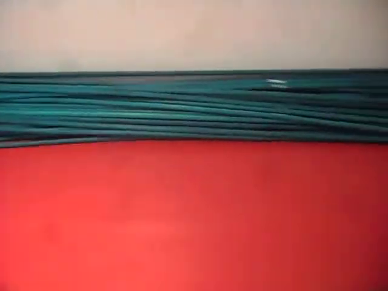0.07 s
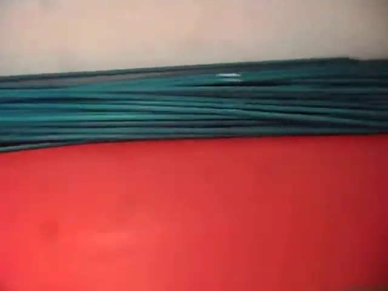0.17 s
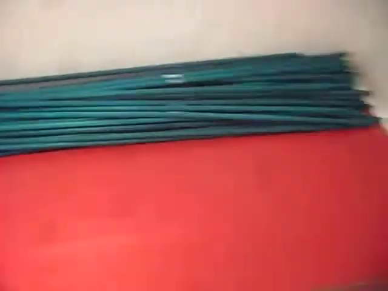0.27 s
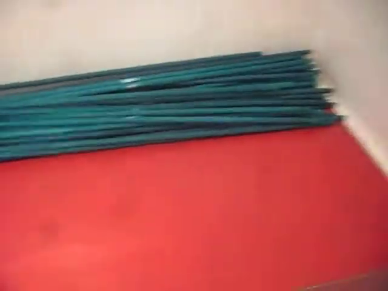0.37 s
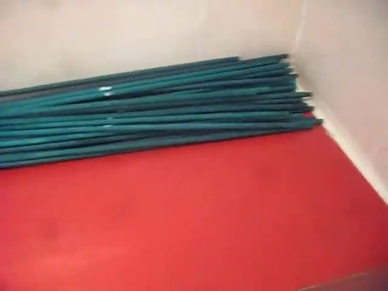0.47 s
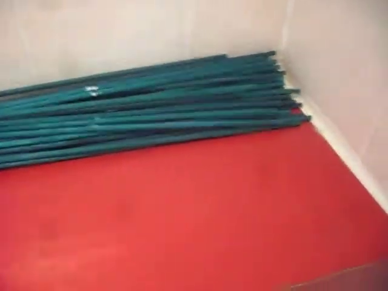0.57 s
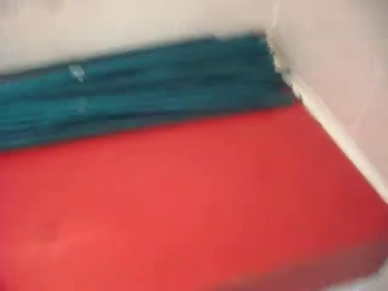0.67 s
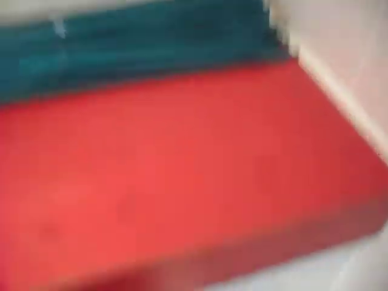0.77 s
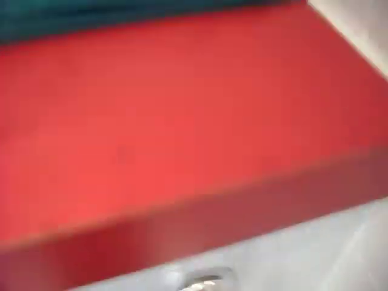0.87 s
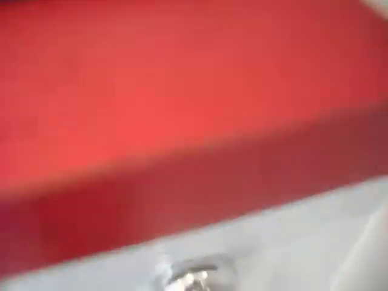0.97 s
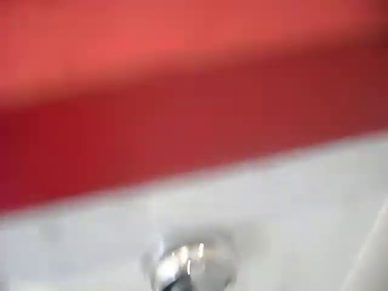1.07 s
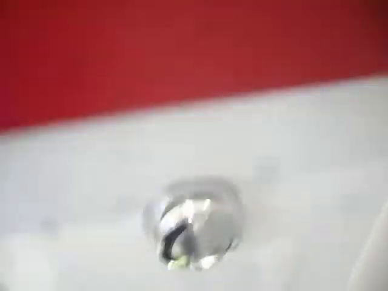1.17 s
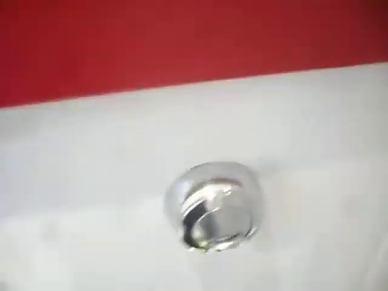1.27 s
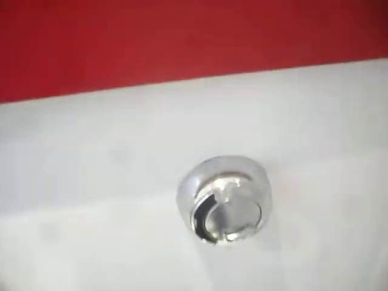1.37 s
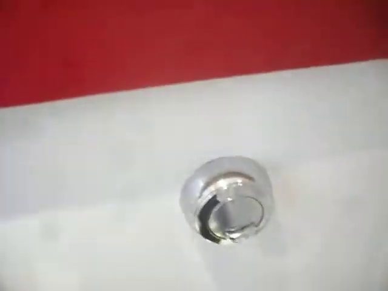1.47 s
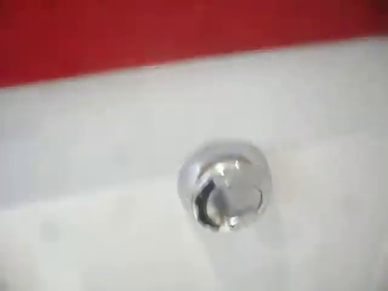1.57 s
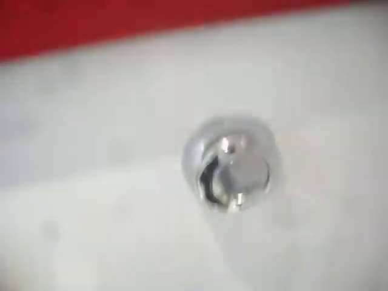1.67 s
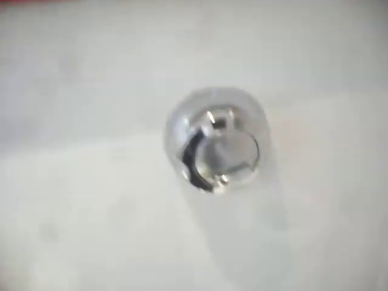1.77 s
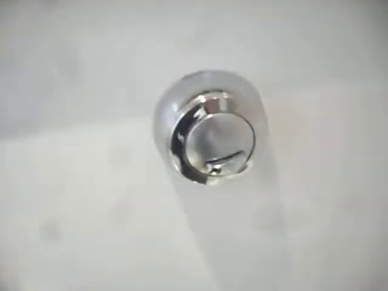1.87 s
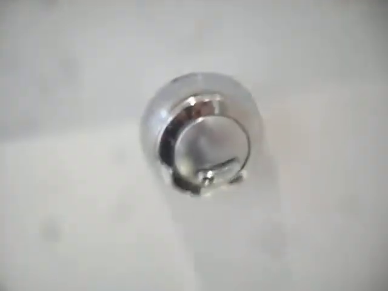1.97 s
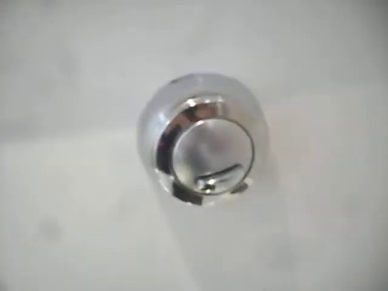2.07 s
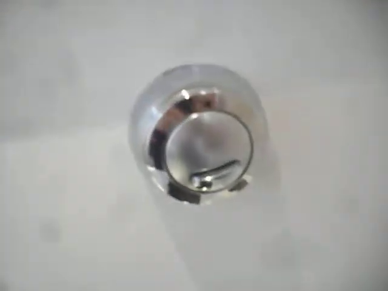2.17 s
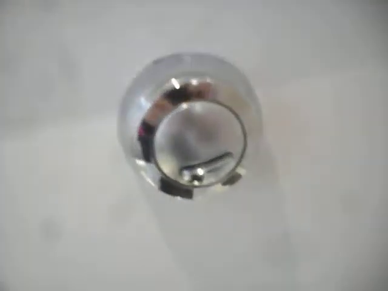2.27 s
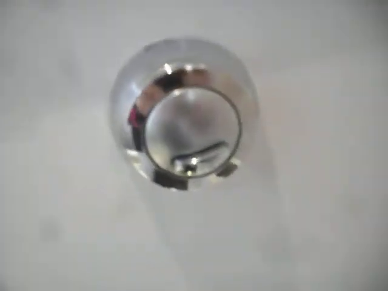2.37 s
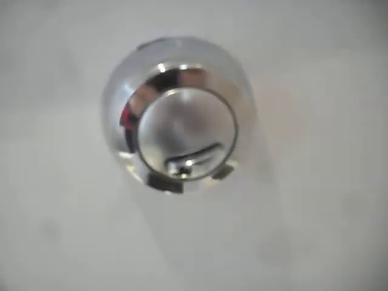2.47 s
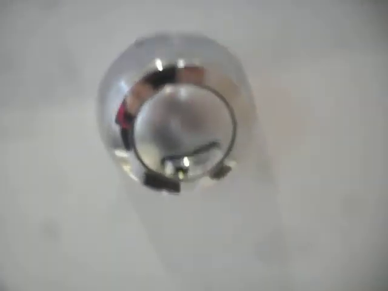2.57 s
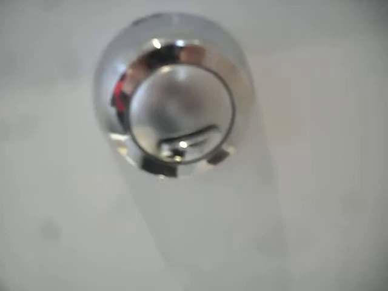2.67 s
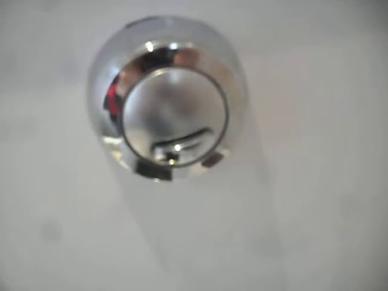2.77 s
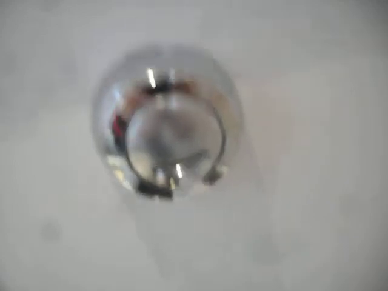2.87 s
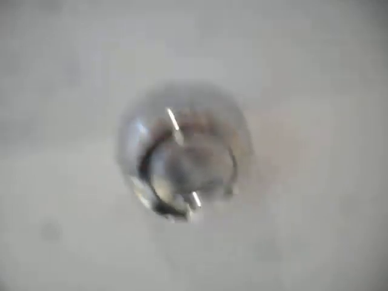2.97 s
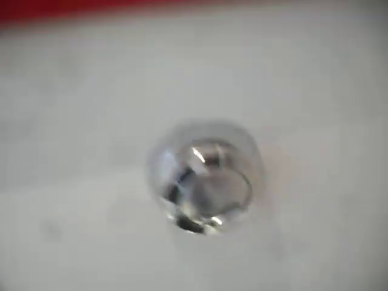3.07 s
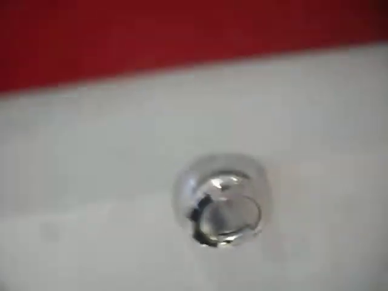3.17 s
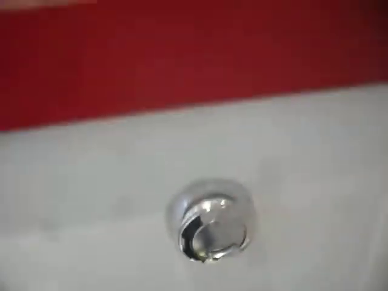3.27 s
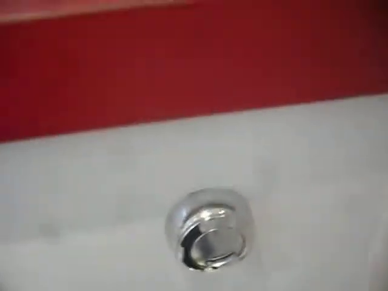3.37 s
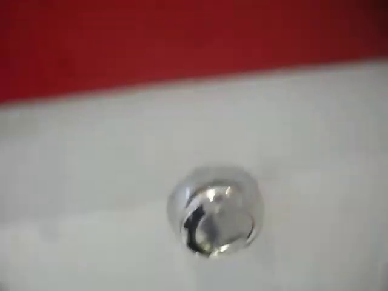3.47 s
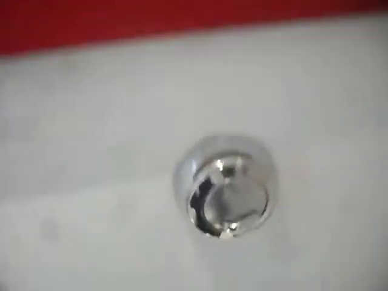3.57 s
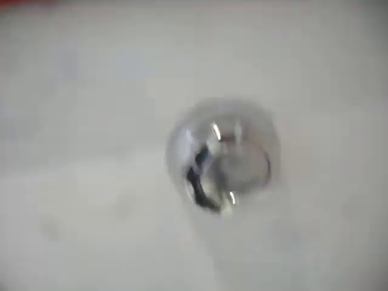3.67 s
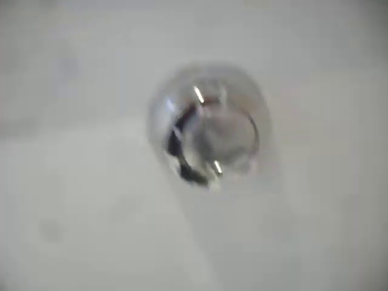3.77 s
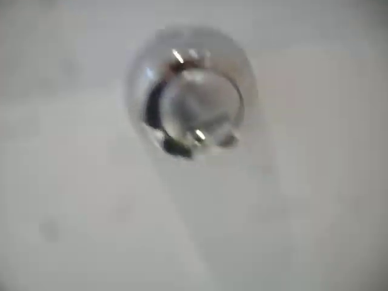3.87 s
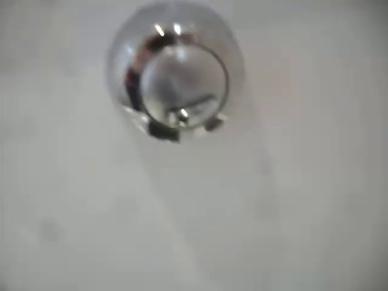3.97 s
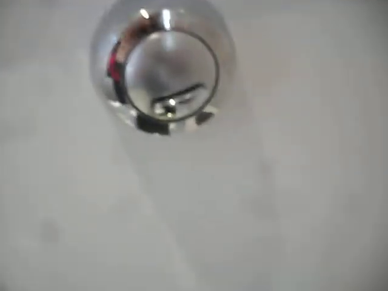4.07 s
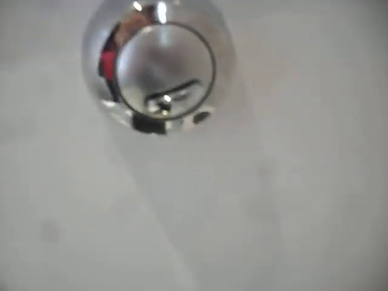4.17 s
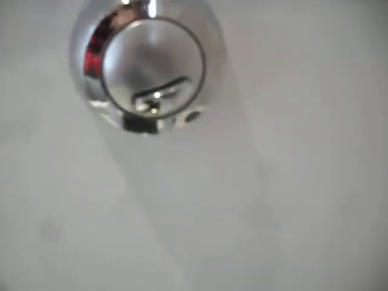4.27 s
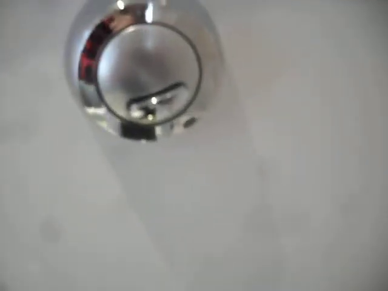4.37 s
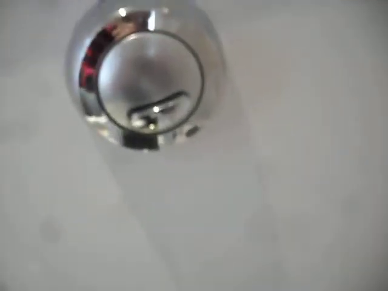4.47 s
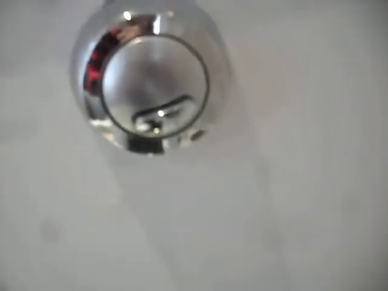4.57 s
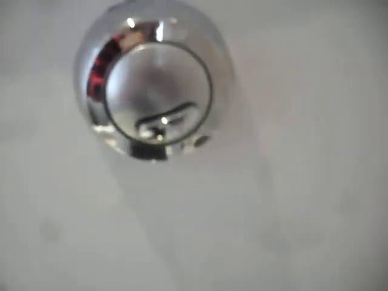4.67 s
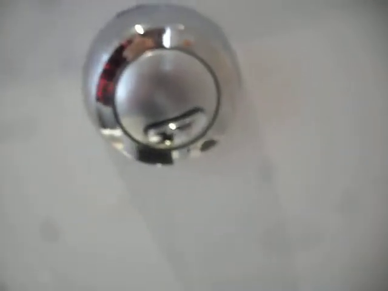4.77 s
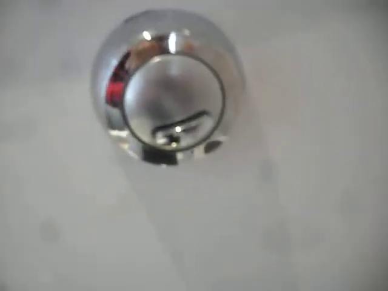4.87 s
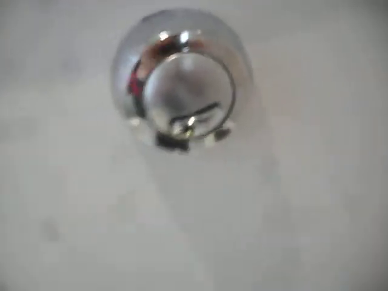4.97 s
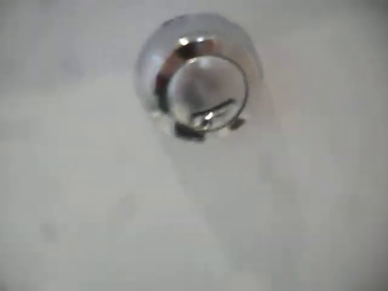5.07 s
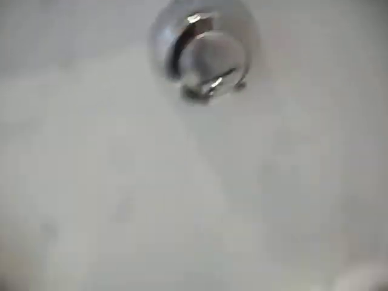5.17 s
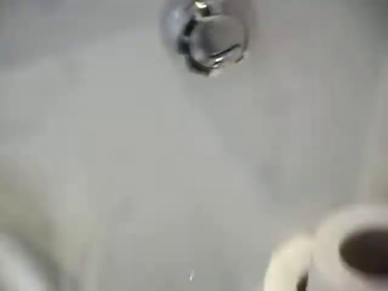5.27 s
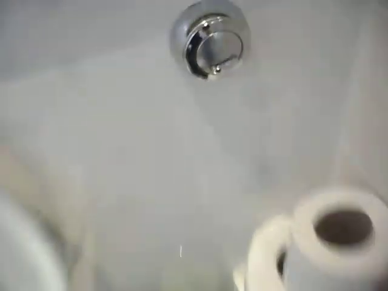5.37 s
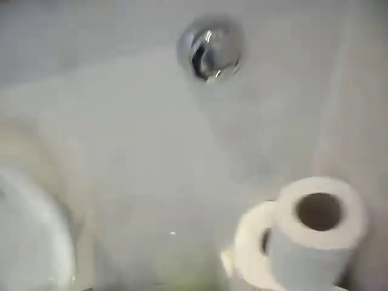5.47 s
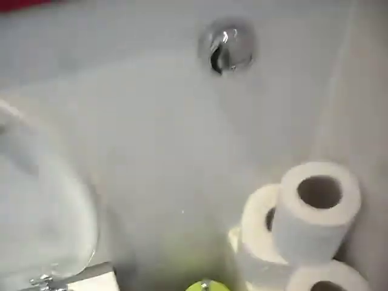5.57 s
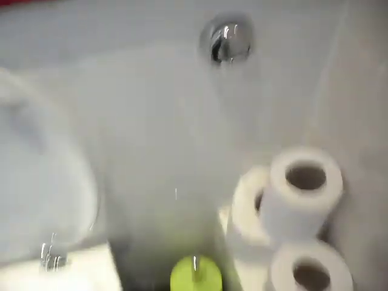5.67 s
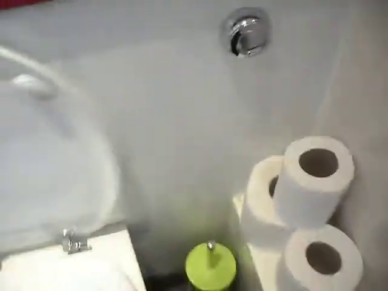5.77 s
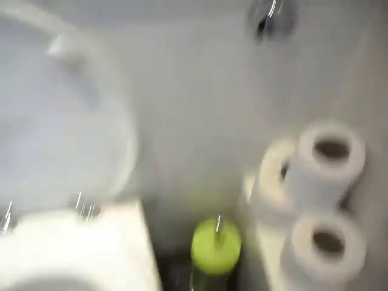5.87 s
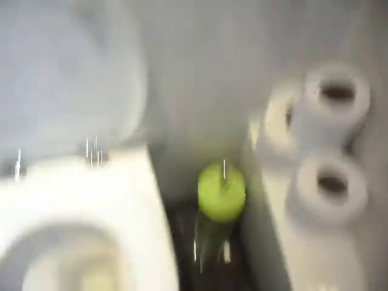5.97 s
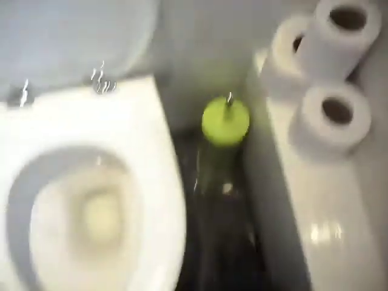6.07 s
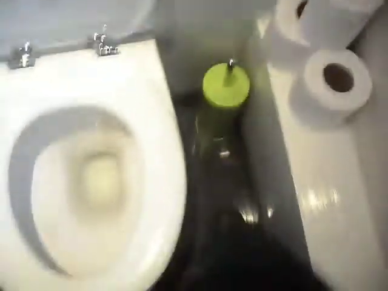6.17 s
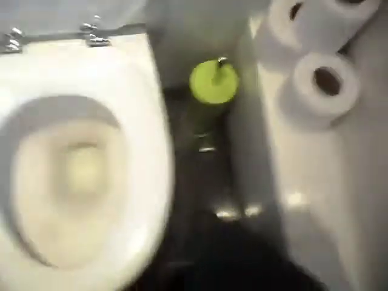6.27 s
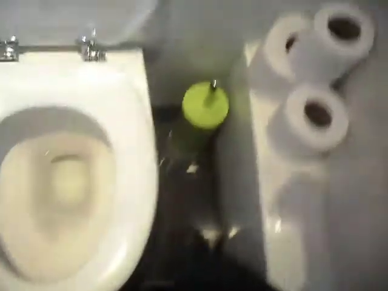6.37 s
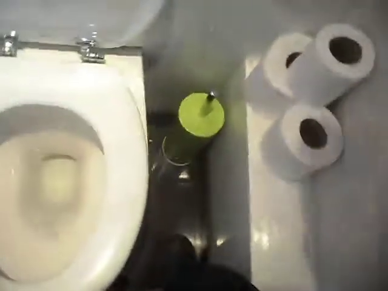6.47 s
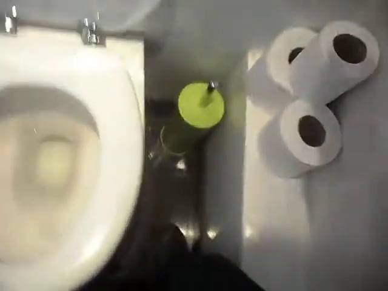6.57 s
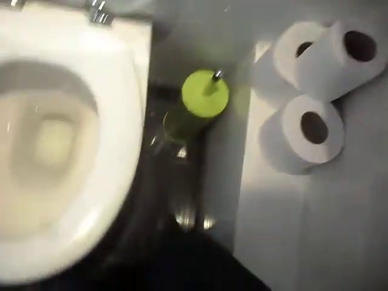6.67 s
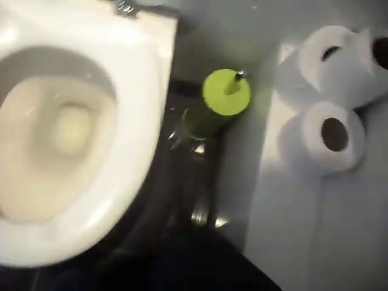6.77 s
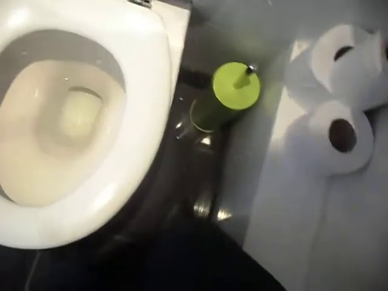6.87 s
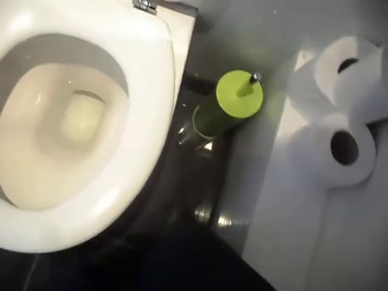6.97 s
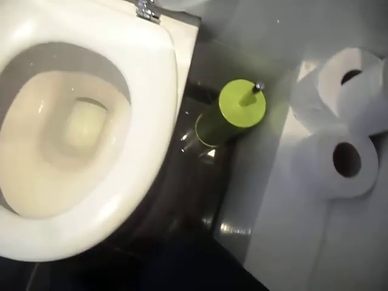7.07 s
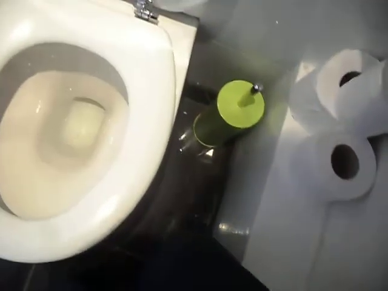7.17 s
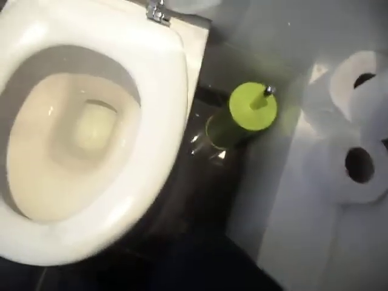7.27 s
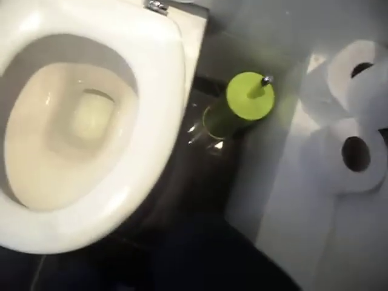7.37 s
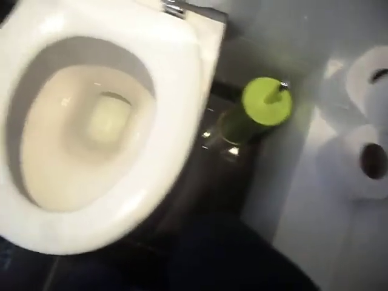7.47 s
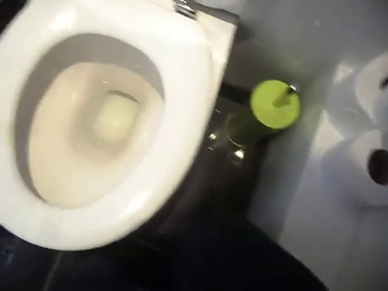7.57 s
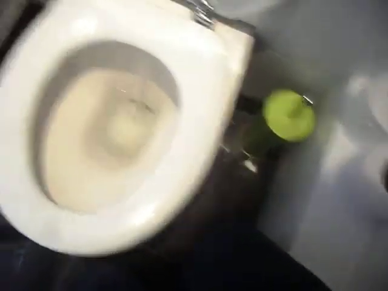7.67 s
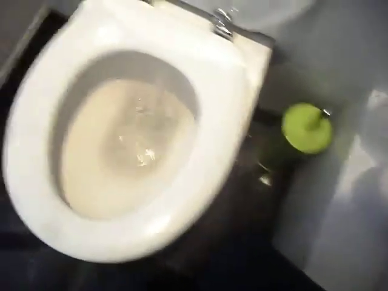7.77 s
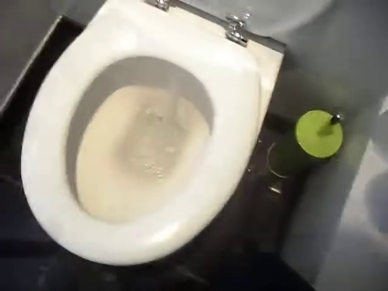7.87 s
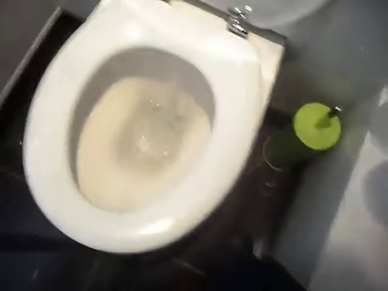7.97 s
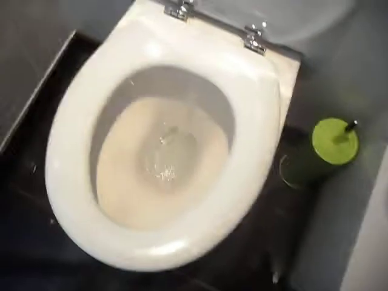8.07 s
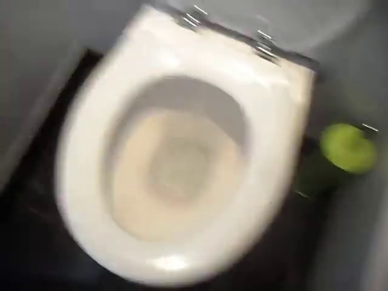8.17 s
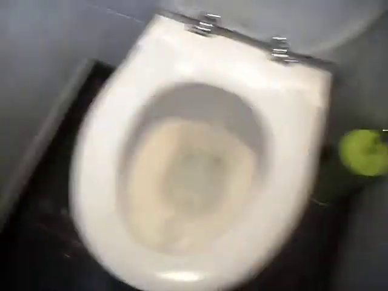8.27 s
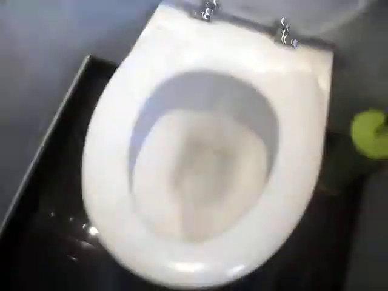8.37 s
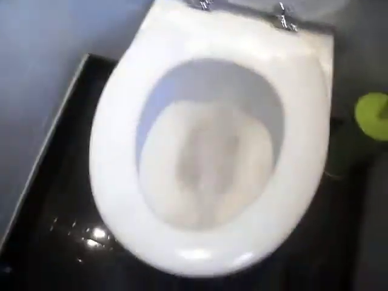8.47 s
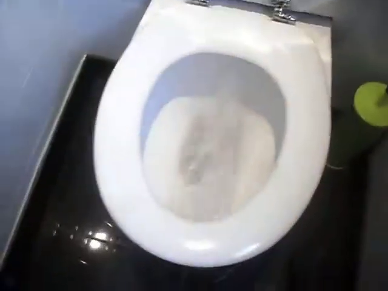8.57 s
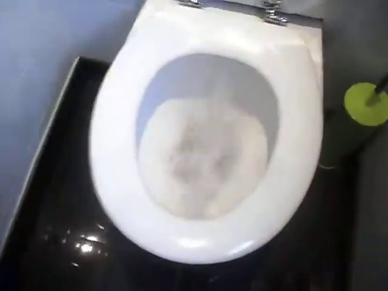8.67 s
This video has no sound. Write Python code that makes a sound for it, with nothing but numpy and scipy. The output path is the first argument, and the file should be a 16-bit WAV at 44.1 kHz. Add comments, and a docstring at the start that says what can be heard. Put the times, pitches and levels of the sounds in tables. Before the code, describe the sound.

A low ventilation hum fills a small tiled restroom, very quiet. At about 0.9 s a hard plastic knock hits the camera case close to the microphone, with a low bump and a faint short ring. Light rubs and small clicks follow, a duller tap at 1.6 s, and another sharp click at 3.0 s. It stays mostly quiet until 5 s, when clicks, low bumps and rustling fingers cluster until about 6.3 s. Dull, soft puffs come at 6.4 to 7.1 s as the button is pushed. From 7.3 s the flush starts: spitting water, sputtering hisses of air from the rim until about 7.75 s, and hollow, resonant gulps near 7.45 s. A strong slap and gulp land at 7.8 s, then bubbling, splashing water pours on, easing slightly around 8.2 s. Another gulp hits at 8.4 s, with a low drain rumble, and the bright spray and rush swell until the abrupt end around 8.7 s.

```python
"""A toilet is flushed in a small tiled restroom, heard from a hand-held camera over a low ventilation hum.
Fingers knock and rub on the camera's case, as ringing modes and tiny grains of noise, and the button is pushed
with low bumps and dull puffs. Water drives the air out of the rim as sputtering resonant hiss, then pours into
the bowl: filtered noise and drops, ringing bubbles, gulps, slaps and spray, with a rumble in the drain."""
import sys
import numpy as np
from scipy import signal
from scipy.fft import rfft, irfft
from scipy.io import wavfile
from scipy.ndimage import uniform_filter1d

SR = 44100
rng = np.random.default_rng(int(sys.argv[2]) if len(sys.argv) > 2 else 0)


def persist_wave(psi):
    """Save psi, clipped to +-1, as 16-bit WAV."""
    counts = np.round(np.clip(psi, -1, 1) * 32767).astype(np.int16)
    wavfile.write(sys.argv[1], SR, np.atleast_2d(counts).T)


N = 384552
TIME, FREQS = np.arange(N) / SR, np.fft.rfftfreq(N, 1 / SR)
SHORT = SR // 2  # samples in the half second that holds one short sound
AGE = TIME[:SHORT]  # seconds since a short sound began


def amp(db):
    """Decibels to gain."""
    return 10 ** (np.asarray(db) / 20)


def evened(x):
    """Scales to rms 1."""
    return x / np.sqrt(np.mean(x ** 2) + 1e-20)


def read(points, hz):
    """Reads a spectrum on a log-frequency axis."""
    f, value = np.transpose(points)
    return np.interp(np.log(hz + 1), np.log(f + 1), value)


def level(rows, column=1):
    """One dB column of a curve as a gain over time, silent before the curve begins."""
    rows = np.array(rows)
    return amp(np.interp(TIME, rows[:, 0], rows[:, column], left=-np.inf))


def add(mix, s, sound):
    """Mixes a sound in at time s."""
    part = mix[round(s * SR):][:len(sound)]
    part += sound[:len(part)]


def dying(t60):
    """Exponential decay by 60 dB in t60 seconds."""
    return np.exp(-np.log(1000) * AGE / t60)


def swell(s, length):
    """An envelope that rises to 1 in a quarter of the length and eases off."""
    age = np.maximum(TIME - s, 0) / (length / 4)
    return age * np.exp(1 - age)


def held(s, length, edge):
    """An envelope that fades in, holds at 1 and fades out."""
    return np.clip(np.minimum(TIME - s, s + length - TIME) / edge, 0, 1)


def shaped(x, gain):
    """Filters a whole track by a gain per frequency; rms 1."""
    return evened(irfft(rfft(x) * gain, N))


def noise(colour):
    """Steady noise of a given spectrum; rms 1."""
    return shaped(rng.standard_normal(N), amp(read(colour, FREQS)))


def drift(rate_hz):
    """Random wander no faster than about rate_hz; rms 1."""
    return shaped(rng.standard_normal(N), np.exp(-(FREQS / rate_hz) ** 2))


def burst(hz, octaves, t60, rise):
    """A puff of noise round one frequency, rms 1 before its rise and decay are applied."""
    f = np.fft.rfftfreq(SHORT, 1 / SR)
    band = 1 / (1 + (np.log2((f + 1) / hz) / octaves) ** 4)
    puff = evened(irfft(rfft(rng.standard_normal(SHORT)) * band, SHORT))
    return puff * dying(t60) * (1 - np.exp(-AGE / rise))


def bubbles(lo_hz, hi_hz, per_s, cycles, spread_db, glide, count=36):
    """Bubbles of many sizes ring for some cycles each, rising in pitch as they surface; rms 1."""
    out = np.zeros(N)
    for hz in np.geomspace(lo_hz, hi_hz, count):
        age = np.arange(0, 5, hz / cycles / SR)  # in decay times
        ring = np.sin(2 * np.pi * cycles * age * (1 + glide * age)) * np.exp(-age)
        strength = np.minimum(rng.exponential(1, N), 2.8)
        starts = rng.random(N) < per_s / count / SR
        out += signal.oaconvolve(amp(spread_db * strength) * starts, ring * np.sqrt(hz))[:N]
    return evened(out)


def churn(gain, drops_per_s, spread_db, wash_db, patch_db, flicker_db):
    """Random impulses over a noise wash, like drops over a breaking sheet: patches of the spectrum come and go."""
    strength = amp(spread_db * np.minimum(rng.exponential(1, N), 4))
    drops = rng.standard_normal(N) * strength * (rng.random(N) < drops_per_s / SR)
    wash = amp(wash_db) * rng.standard_normal(N)
    z = signal.stft(evened(drops) + wash, nperseg=256)[2]
    patches = uniform_filter1d(rng.standard_normal(z.shape), size=5, axis=0)  # smooth over frequency
    patches = evened(uniform_filter1d(patches, size=8, axis=1))  # and over time
    water = signal.istft(z * amp(patch_db * patches), nperseg=256)[1][:N]
    return shaped(water * amp(flicker_db * drift(79)), gain)


# Spectrum of the air moving in the vent. Each row: frequency in Hz, relative level in dB.
VENT_COLOUR = [(12, -52), (20, 1), (69, -8), (85, -6), (102, -9.5), (123, -7), (211, -7.5), (254, -14.5),
               (390, -21), (423, -19.5), (458, -23), (1890, -29.5), (2050, -29.5), (9430, -36),
               (12000, -41.5), (15600, -89), (22000, -120)]
# The air duct rings faintly. Each row: frequency in Hz, width in Hz, relative level in dB.
DUCT_RINGS = [(550, 35, -67), (649, 14, -67.5)]
# The hum changes as the camera moves about the room.
# Each row: time in seconds, relative level of the mains hum in dB, relative level of its octave in dB.
HUM_LEVELS = [(0.0, -50, -51), (0.16, -52.5, -51.5), (4.91, -53, -62), (5.07, -50, -58),
              (5.37, -55.5, -57.5), (7.2, -53.5, -57.5)]


def ventilation(air_db=-50, hum_hz=100, hum_db=-1, octave_db=-4.5, duct_db=-5):
    """Steady noise of moving air, narrow bands from the duct, and a wavering mains hum with its octave."""
    turn = 2 * np.pi * hum_hz * TIME + 0.31 * drift(4.2)
    hum = amp(hum_db) * level(HUM_LEVELS) * np.sin(turn)
    hum += amp(octave_db) * level(HUM_LEVELS, column=2) * np.sin(2 * turn)
    hum *= np.sqrt(2) * amp(3.0 * drift(5.0))
    duct = np.zeros(N)
    for hz, width, db in DUCT_RINGS:
        resonance = 1 / (1 + ((FREQS - hz) / width) ** 2)
        duct += amp(db + duct_db) * shaped(rng.standard_normal(N), resonance)
    return amp(air_db) * noise(VENT_COLOUR) + duct + hum


# Low bumps as the camera is handled and the button is pushed. Each row: start in seconds, level in dB.
LOW_BUMPS = [(0.927, -23.5), (1.629, -26.5), (1.72, -34), (2.148, -34.5), (2.65, -29.5), (5.199, -31.5),
             (5.279, -39), (5.913, -30), (6.16, -38), (6.184, -33), (6.389, -37)]


def bumps(hz=75, t60=0.044):
    """Soft low pushes on the microphone: a damped low tone with a puff of low noise."""
    out = np.zeros(N)
    for s, db in LOW_BUMPS:
        push = np.sin(2 * np.pi * hz * AGE) * dying(t60)
        add(out, s, amp(db) * (push + amp(-6.0) * burst(138, 1.93, 0.032, 0.0014)))
    return out


# Fingers click on the case, right at the microphone.
# Each row: start in seconds, peak level in dB, relative treble in dB, centre of the ring in Hz.
CASE_CLICKS = [(0.929, -9, -10.5, 1210), (0.941, -28, -7, 1150), (1.278, -31, 0, 3230),
               (1.309, -37, -8, 1010), (1.625, -19.5, -36, 1360), (2.219, -35.5, -15, 1110),
               (2.804, -39.5, -15, 595), (3.03, -11, -8, 2000), (3.239, -41.5, 2, 5920),
               (3.508, -37, -24, 660), (4.99, -36, -11, 2420), (5.079, -17.5, -3, 1100),
               (5.195, -27, -15, 800), (5.261, -21.5, -25, 5700), (5.278, -20, -19, 3150),
               (5.598, -35.5, -13, 716), (5.627, -28.5, -1, 5260), (5.718, -33, -23, 1800),
               (5.779, -26, -21, 1430), (5.791, -29, -9, 5480), (5.814, -19.5, 11, 3830),
               (5.819, -20.5, 0.5, 1450), (5.842, -28.5, -28, 555), (5.916, -25.5, -4.5, 520),
               (6.07, -19.5, -38, 980), (6.123, -16, -21, 1460), (6.16, -19, -13.5, 1040),
               (6.182, -23, -19, 1000), (6.253, -28.5, -32, 810)]
# Modes of the case. Each row: nominal frequency in Hz, relative level in dB, 60 dB decay time in seconds.
CASE_MODES = [(480, 6, 0.0064), (782, -2, 0.015), (1165, -1, 0.017), (1500, 1.5, 0.014), (1877, 2.5, 0.011),
              (2390, -9, 0.017), (3236, 6, 0.0066), (5080, -7, 0.0098), (5680, 1, 0.012),
              (6900, 0.5, 0.0069), (9300, 7.5, 0.0027)]


def clicks(crack_db=10, crack_t60=0.0083, focus_octaves=0.92, chatter=0.14, chatter_s=0.0067):
    """A chatter of contacts rings the plastic case, weighted by where it is touched, over a noise crack."""
    out = np.zeros(N)
    hz, db, t60 = np.transpose(CASE_MODES)[:, :, None]
    for s, peak_db, treble_db, centre_hz in CASE_CLICKS:
        weight = amp(db) / (1 + (np.log2(hz / centre_hz) / focus_octaves) ** 2)
        weight = weight * np.minimum(hz / centre_hz, 1) ** 0.5
        pitch = hz * rng.uniform(0.94, 1.04, hz.shape)
        sign = rng.choice([-1, 1], hz.shape)
        ring = (sign * weight * np.sin(2 * np.pi * pitch * AGE) * dying(t60)).sum(0)
        # the first contact, then weaker ones at 1500 a second
        again = rng.uniform(-2.14, 1, SHORT) * (rng.random(SHORT) < 1500 / SR)
        contacts = (AGE == 0) + chatter * again * np.exp(-AGE / chatter_s)
        ring = signal.fftconvolve(ring, contacts)[:SHORT]
        crack = amp(crack_db + treble_db) * burst(3900, 0.75, crack_t60, 0.0007) / 2
        click = ring / abs(ring).max() + crack
        add(out, s, amp(peak_db) * click / abs(click).max())
    return out


# The hardest knock leaves something ringing.
# Each row: frequency in Hz, level in dB, 60 dB decay time in seconds.
KNOCK_PARTIALS = [(1147, -48, 0.17), (2240, -59, .23), (2460, -56, .22), (3257, -60, .2)]


def after_ring(start_s=0.932):
    """A few faint, slowly dying partials."""
    out = np.zeros(N)
    for hz, db, t60 in KNOCK_PARTIALS:
        add(out, start_s, amp(db) * np.sin(2 * np.pi * hz * AGE) * dying(t60))
    return out


# Fingers slide on the case.
# Each row: start in seconds, length in seconds, level in dB, treble tilt in dB per octave (eased in the bass).
FINGER_RUBS = [(1.188, 0.21, -54.5, 3), (1.447, 0.13, -55.5, -15), (4.124, 0.078, -54, -19),
               (5.046, 0.039, -55, 1), (5.271, 0.019, -37, -6), (5.394, 0.094, -50, 6.5),
               (5.63, 0.072, -57, -9), (5.799, 0.024, -35.5, 3.5), (5.89, 0.055, -58, -15),
               (6.008, 0.2, -52.5, -9), (6.164, 0.036, -41, 7)]
# Spectrum of skin on the case, before the tilt. Each row: frequency in Hz, relative level in dB.
RUB_SPECTRUM = [(300, -4), (1500, -2.5), (2400, -8), (3400, -3.5), (4500, -14), (5900, -4.5), (8000, -15.5),
                (10500, -22)]
# The hand rustles while it turns the camera.
GRIP_S, GRIP_LENGTH_S, GRIP_EDGE_S, GRIP_DB = 4.93, 1.3, 0.083, -60


def rubs(grain_db=3, uneven_db=4):
    """Skin slips over the case in tiny grains: single strokes, and an uneven rustle as the grip turns."""
    grains = churn(amp(read(RUB_SPECTRUM, FREQS)), 2500, grain_db, 5.0, 3.8, 1.3)
    rustle = amp(GRIP_DB + uneven_db * drift(16))
    out = rustle * held(GRIP_S, GRIP_LENGTH_S, GRIP_EDGE_S) * grains
    for s, length, db, tilt_db in FINGER_RUBS:
        tilt = amp(tilt_db * np.log2(FREQS / 3000 + 0.66))
        out += amp(db) * swell(s, length) * shaped(grains, tilt)
    return out


# Dull puffs as the button is pushed, then the first spits of water.
# Each row: start in seconds, relative level in dB, centre in Hz, 60 dB decay time in seconds.
FIRST_PUFFS = [(6.38, -44.5, 620, 0.34), (6.551, -49.5, 690, 0.18), (6.985, -51.5, 960, 0.26),
               (7.12, -50.5, 690, 0.32), (7.254, -40, 1640, 0.17), (7.332, -41, 685, 0.5)]


def first_puffs():
    """Dull puffs as the button is pushed, then the first spits of water: dying bands of noise."""
    out = np.zeros(N)
    for s, db, hz, t60 in FIRST_PUFFS:
        add(out, s, amp(db) * burst(hz, 1.2, t60, 0.0072))
    return out


# Strength of the flush. Each row: time in seconds, relative level in dB.
FLUSH_FLOW = [(7.32, -54), (7.35, -44), (7.45, -34), (7.71, -32), (7.9, -30), (8.05, -30.8), (8.26, -32),
              (8.5, -27.5), (8.7, -23.5)]
# Cavity resonances of the bowl. Each row: frequency in Hz, width in Hz, relative level in dB.
BOWL_MODES = [(99, 21, -7), (157, 23, -3), (188, 15, -16), (292, 59, 4), (350, 19, 5), (469, 26, -7),
              (641, 53, 0), (745, 150, -9), (884, 54, -2)]
# Spectrum between the resonances. Each row: frequency in Hz, relative level in dB.
POUR_SPECTRUM = [(100, -38), (240, -31), (400, -7.5), (900, -34), (1300, -12.5), (2500, -48)]
# Spectrum of the shaken drain. Each row: frequency in Hz, relative level in dB.
RUMBLE_SPECTRUM = [(20, -1), (40, -20), (65, 0.5), (100, 1.5), (160, 5.5), (220, -3), (400, -32)]
# Slugs of water plunge into the pool. Each row: start in seconds, length in seconds,
# relative ring of the bowl in dB, relative thump in the drain in dB.
PLUNGES = [(7.457, 0.057, -21.5, -28), (7.542, .15, -27, -50), (7.767, 0.15, -32, -44),
           (7.844, .1, -26, -51), (7.927, 0.12, -26.5, -53), (8.266, 0.097, -34, -29.5),
           (8.39, 0.057, -28, -32.5), (8.468, 0.054, -22, -27), (8.54, 0.062, -34, -29)]
LANDS_S = 7.53  # the water reaches the pool and starts to foam
FOAM_DB_PER_S = -3.5  # foam damps the ring of the bowl


def pour(pour_db=-3.5, rumble_db=0.5, bubble_db=-10, glug_db=-14, stream_db=4.5, drain_db=-12):
    """Falling water rings the bowl's cavity, folds air under and shakes the drain; plunges add to both."""
    power = amp(read(POUR_SPECTRUM, FREQS)) ** 2
    for hz, width, db in BOWL_MODES:
        power += amp(db) ** 2 / (1 + ((FREQS - hz) / (width / 2)) ** 2) ** 1.95
    body = churn(np.sqrt(power), 400, 1.9, -3.6, 1.0, 2.7)
    gurgle = bubbles(419, 1301, 91, 15.0, 2.9, 0.0264, count=16)
    glugs = bubbles(269.5, 392.6, 49, 17.4, 1.3, 0.0135, count=6)
    water = amp(pour_db) * body + amp(bubble_db) * gurgle + amp(glug_db) * glugs
    flow = level(FLUSH_FLOW)
    ring = flow * amp(stream_db + FOAM_DB_PER_S * np.maximum(TIME - LANDS_S, 0))
    shake = flow * amp(drain_db)
    for s, length, ring_db, thump_db in PLUNGES:
        plunge = swell(s, length)
        ring = np.hypot(ring, amp(ring_db) * plunge)
        shake = np.hypot(shake, amp(thump_db) * plunge)
    return ring * water + shake * amp(rumble_db) * noise(RUMBLE_SPECTRUM)


# Spectrum of water breaking on the porcelain. Each row: frequency in Hz, relative level in dB.
SPLASH_SPECTRUM = [(300, -26), (800, 7), (1100, -0.5), (1700, 7.5), (2100, 2.5), (2700, 2.5), (3600, 1),
                   (5000, -3), (7000, -10), (10500, -20)]
# Spectrum of the fine spray. Each row: frequency in Hz, relative level in dB.
SPRAY_SPECTRUM = [(2000, -36), (4500, -3), (6300, -3), (8000, -5), (9800, -7), (11000, -16)]
SPRAY_BUILD_S = 0.61  # spray and pips build up over this time


def splashing(splash_db=-2.5, bubble_db=-6, pip_db=-10, spray_db=-6, spray_power=1.54):
    """Water breaks into drops, froth and clear pips; fine spray builds up and grows faster than the flow."""
    sheet = churn(amp(read(SPLASH_SPECTRUM, FREQS)), 2000, 3.2, -1, 2.3, 1.4)
    froth = bubbles(950, 5000, 600, 11, 5, 0.005)
    pips = bubbles(2400, 3100, 45, 25, 4, 0.006, count=8)
    spray = churn(amp(read(SPRAY_SPECTRUM, FREQS)), 800, 4.2, -3, 2.4, 1.5)
    flow = level(FLUSH_FLOW)
    foam = np.clip((TIME - LANDS_S) / SPRAY_BUILD_S, 0, 1)
    mist = flow.max() * (flow / flow.max()) ** spray_power * foam
    splash = amp(splash_db) * sheet + amp(bubble_db) * froth + foam * amp(pip_db) * pips
    return flow * splash + mist * amp(spray_db) * spray


# Air hisses out of the rim in spurts.
# Each row: start in seconds, length in seconds, relative level in dB, resonance at the start in Hz.
AIR_SPURTS = [(7.385, 0.087, -32, 6020), (7.465, 0.053, -33.5, 4550), (7.572, 0.058, -32, 4400),
              (7.665, 0.091, -35, 2113)]
AIR_EDGE_S, AIR_SAG_PER_S = 0.017, 0.605  # fade at each end; share by which the resonances sink a second


def rim_air(width_hz=420, sputter_db=3.0, gain_db=-2):
    """Air squeezed through the rim holes: spurts of sputtering hiss whose resonances sink together."""
    holes = [(1, 9), (1.18, 0), (0.58, 4), (2.3, -24)]  # (multiple of the resonance, dB)
    eddies = [amp(hole_db) * (drift(width_hz) + 1j * drift(width_hz)) for _, hole_db in holes]
    out = np.zeros(N)
    for s, length, db, hz in AIR_SPURTS:
        gate = held(s, length, AIR_EDGE_S)
        on = gate > 0
        turn = 2 * np.pi * np.cumsum(hz * (1 - AIR_SAG_PER_S * (TIME[on] - s))) / SR
        hiss = np.zeros(len(turn))
        for eddy, (multiple, _) in zip(eddies, holes):
            hiss += (eddy[on] * np.exp(1j * multiple * turn)).real
        add(out, s, amp(db + gain_db) * gate[on] * evened(hiss))
    return out * amp(sputter_db * drift(60))


# Gulps of water ring the bowl. Each row: start in seconds, relative level in dB, starting frequency in Hz,
# 60 dB decay time in seconds.
BOWL_GULPS = [(7.411, -28, 182, 0.37), (7.452, -14.5, 617.5, 0.21), (7.455, -16, 315.4, 0.2),
              (7.467, -20.5, 172.8, 0.26), (7.501, -14.5, 474, 0.052), (7.51, -18.5, 350, 0.24),
              (7.585, -27, 157, 0.35), (7.80, -9.5, 904, 0.038), (7.814, -12.5, 428, 0.052),
              (7.863, -18, 288, 0.35), (7.868, -19, 853, 0.096), (7.955, -23, 864, 0.16),
              (8.16, -18, 658, .1), (8.392, -9, 607, 0.059), (8.587, -14.5, 292, .15)]


def gulps(glide=0.071):
    """Gulps of water ring the bowl: damped tones that rise a little in pitch, with a trace of noise."""
    out = np.zeros(N)
    for s, db, hz, t60 in BOWL_GULPS:
        tone = np.sin(2 * np.pi * hz * AGE * (1 + glide * AGE))
        ring = tone * dying(t60) * (1 - np.exp(-AGE / 0.00099))
        add(out, s, amp(db) * (ring + amp(-18.0) * burst(hz, 0.88, t60, 0.0034)))
    return out


# Single spits and slaps of water. Each row: start in seconds, relative level in dB, centre in Hz,
# width in octaves, 60 dB decay time in seconds.
WATER_SLAPS = [(7.463, -26.5, 1500, 1.4, 0.07), (7.568, -35, 6800, 0.37, 0.24),
               (7.576, -16, 4440, 0.31, 0.04), (7.643, -21, 3770, 0.082, 0.035),
               (7.714, -23, 2720, 0.1, 0.054), (7.724, -29, 9300, .15, 0.023),
               (7.752, -22, 4550, 0.59, 0.033), (7.799, -19.5, 9300, 0.16, 0.023),
               (7.8, -11.5, 2880, 1.06, 0.039), (7.945, -27.5, 5450, 1.1, 0.096),
               (8.036, -25, 3080, 0.44, 0.075), (8.092, -22, 2770, 0.28, 0.042),
               (8.161, -22.5, 3300, 0.99, 0.097), (8.318, -27, 2720, 0.22, 0.12),
               (8.396, -25.5, 2920, 0.9, 0.12), (8.412, -15.5, 2880, 0.64, 0.025),
               (8.491, -18, 2400, 1.1, 0.081), (8.653, -18.5, 1500, 0.9, 0.071)]


def slaps():
    """Water spits and slaps: sharp puffs of noise in a band."""
    out = np.zeros(N)
    for s, db, hz, octaves, t60 in WATER_SLAPS:
        add(out, s, amp(db) * burst(hz, octaves, t60, 0.00072))
    return out


def drain(start_s=8.27, rise_s=0.15, hz=38, db=-41):
    """Once the trap is full the drain draws: low-passed noise, more felt than heard."""
    rumble = shaped(rng.standard_normal(N), 1 / (1 + (FREQS / hz) ** 4))
    return amp(db) * np.clip((TIME - start_s) / rise_s, 0, 1) * rumble


# Decay of the small tiled restroom. Each row: frequency in Hz, 60 dB decay time in seconds.
ROOM_DECAY = [(100, 0.23), (400, 0.57), (2000, 0.32), (10000, 0.39)]


def room(x):
    """Dense random reflections off the tiles, each band decaying at its own rate."""
    taps = rng.choice([-1., 1.], SHORT) * (rng.random(SHORT) < 3000 / SR)
    taps = taps * (AGE > 0.004)  # nothing returns sooner
    hz, t, z = signal.stft(taps, SR, nperseg=256)
    decay = np.exp(-np.log(1000) * t / read(ROOM_DECAY, hz)[:, None])
    tail = signal.istft(z * decay, SR, nperseg=256)[1]
    return signal.fftconvolve(x, tail / np.linalg.norm(tail))[:N]


def scene():
    """The toilet sounds through the room; the handling reaches the microphone through the case."""
    air = ventilation()
    handling = bumps() + clicks() + after_ring() + rubs()
    toilet = first_puffs() + pour() + splashing() + rim_air() + gulps() + slaps() + drain()
    leak = amp(-27) * room(handling)  # a little of the handling also sounds in the room
    return (amp(0.5) * toilet + amp(-6.0) * room(toilet) + handling + leak + air)[None]


# Treble response of the camera's microphone. Each row: frequency in Hz, gain in dB.
MICROPHONE_RESPONSE = [(10200, 0), (10600, -5), (11000, -15.5), (11800, -12), (12400, -36)]


def record(dry, edge_hz=12400):
    """The camera's treble roll-off and band limit, as one linear-phase filter."""
    hz = np.linspace(0, SR / 2, 513)
    gain = amp(read(MICROPHONE_RESPONSE, hz)) * (hz < edge_hz)
    taps = signal.firwin2(255, hz, gain, window=("kaiser", 8), fs=SR)
    return signal.oaconvolve(dry, taps[None], "same")


dry = scene()
out = record(dry)
persist_wave(out)
```